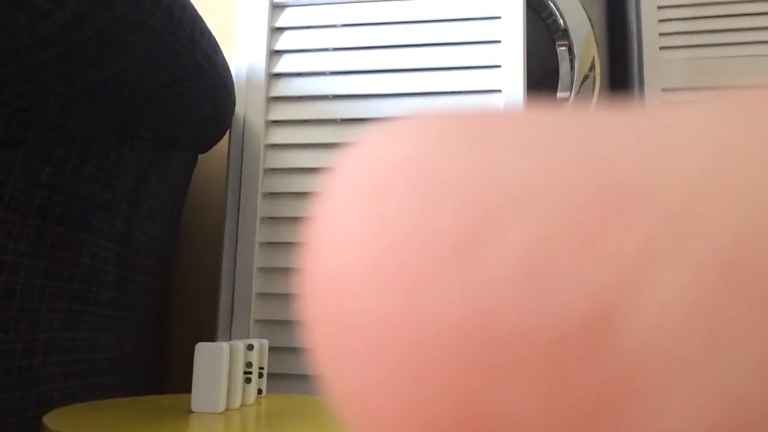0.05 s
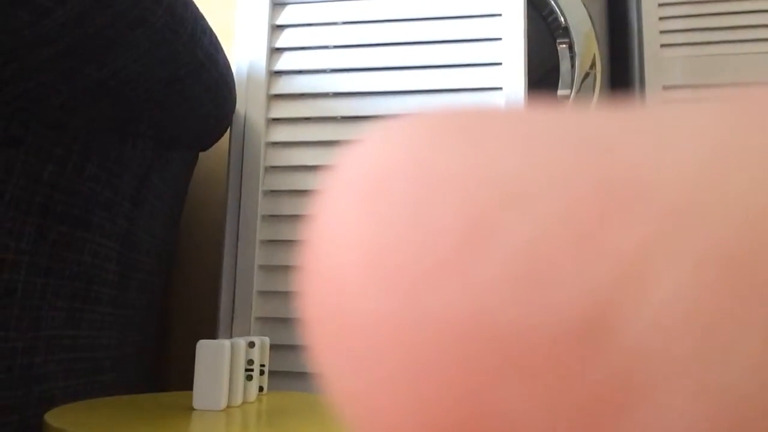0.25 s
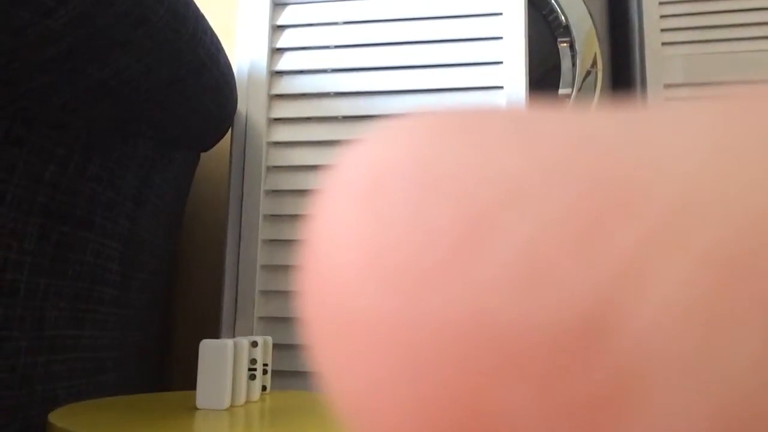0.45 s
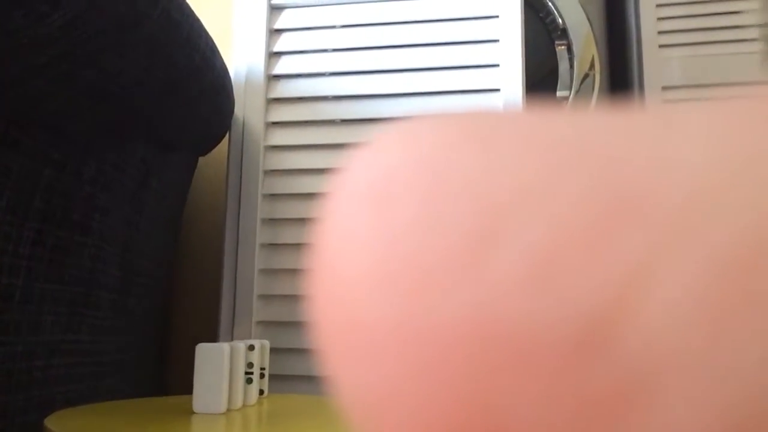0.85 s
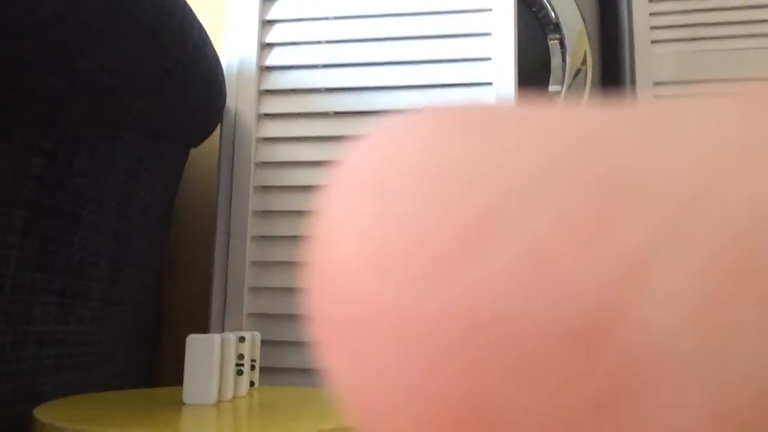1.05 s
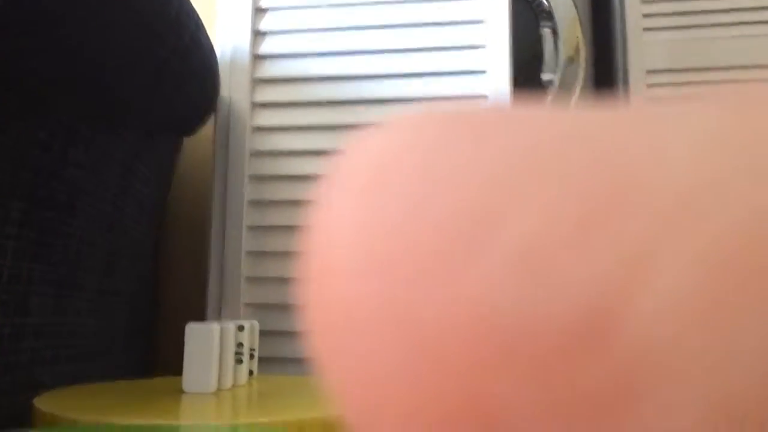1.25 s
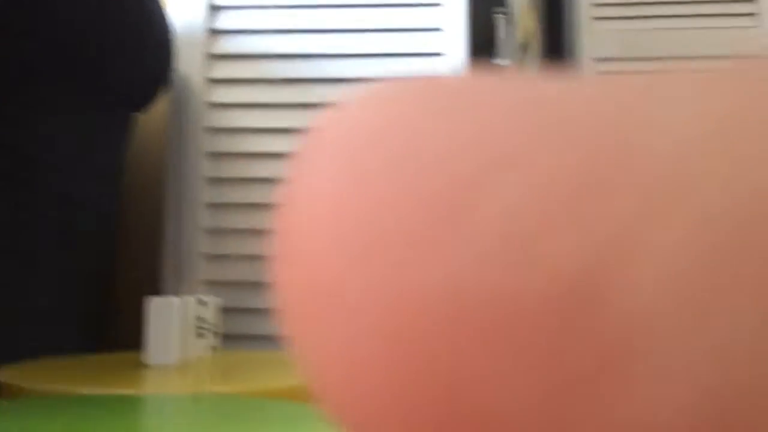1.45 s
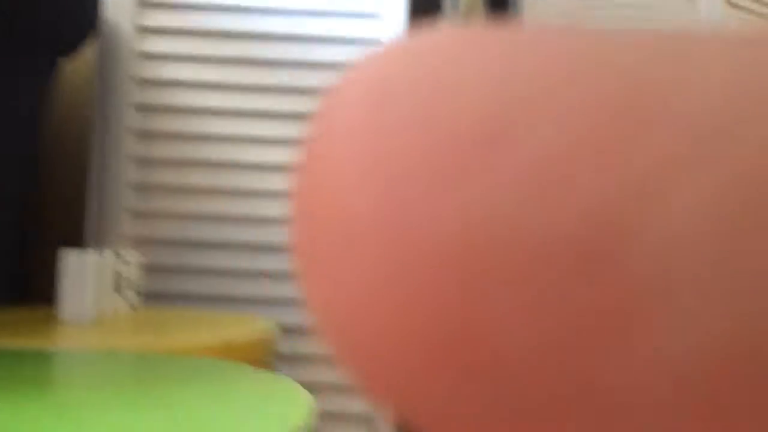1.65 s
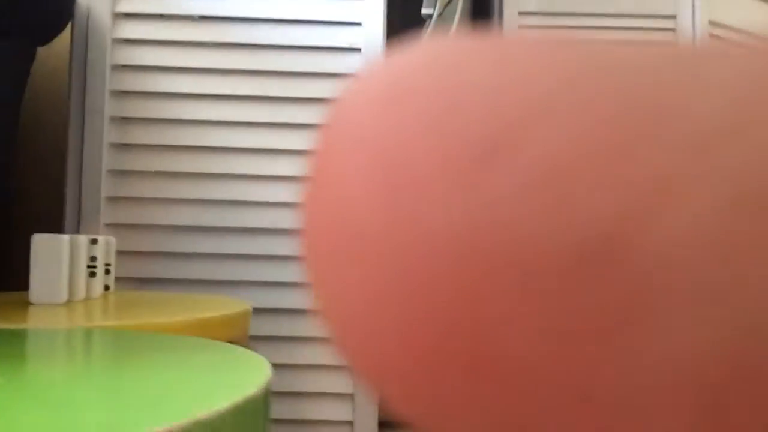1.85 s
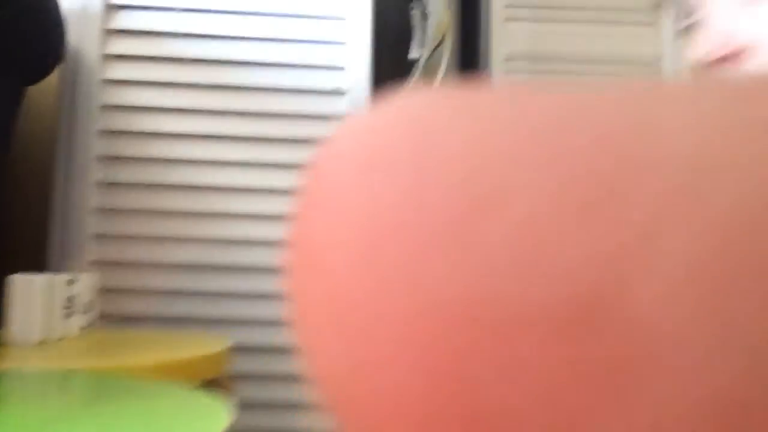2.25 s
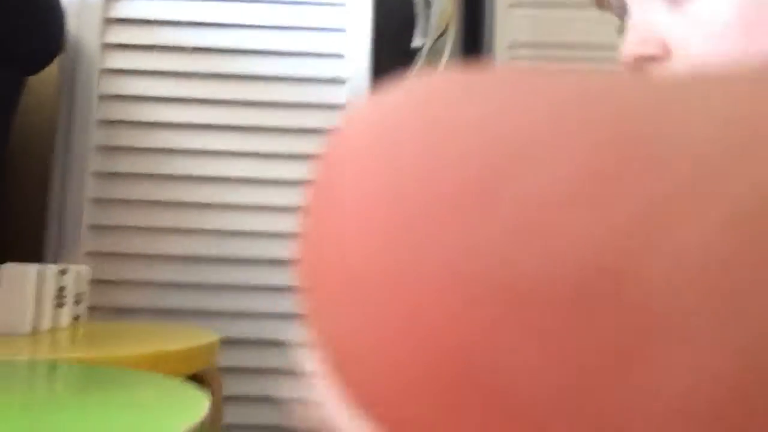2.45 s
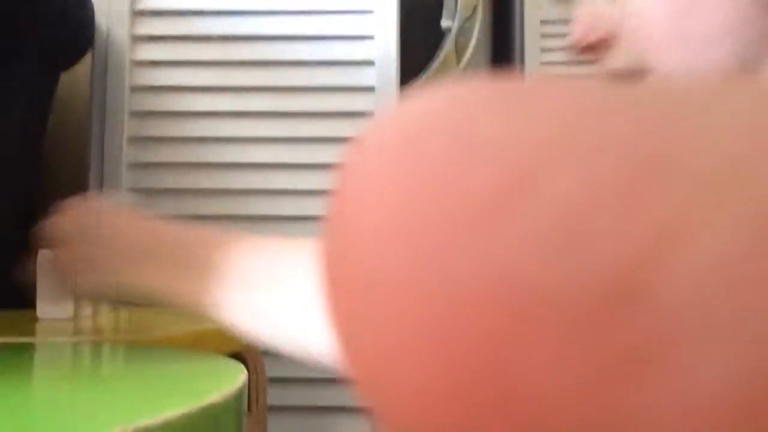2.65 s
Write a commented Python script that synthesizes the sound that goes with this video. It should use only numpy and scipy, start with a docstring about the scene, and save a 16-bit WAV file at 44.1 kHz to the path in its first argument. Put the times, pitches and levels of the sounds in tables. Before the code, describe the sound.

Dominoes slide and tumble on a tabletop with bright clinks, one bounce and light rattles.

```python
"""Dominoes on a small table in a quiet room, close to a single microphone.
First tiles scrape over the top, catching and slipping, and knock as they are set down.
They tumble against each other with bright clinks; then one drops and bounces, ringing the table,
and the weight of the heap draws a brief low rumble from the top.
Last, the loose tiles are stirred and gathered in soft rattles."""
import sys
import numpy as np
from scipy import signal
from scipy.fft import rfft, irfft
from scipy.io import wavfile

SR = 44100
rng = np.random.default_rng(int(sys.argv[2]) if len(sys.argv) > 2 else 0)


def to_wav(s):
    """Save 16-bit WAV."""
    ch = np.atleast_2d(s).T  # columns
    pcm = np.round(np.clip(ch, -1, 1) * 32767)  # PCM
    wavfile.write(sys.argv[1], SR, pcm.astype(np.int16))


N = 119070
T = np.arange(SR // 3) / SR  # seconds since a contact

# Levels in the tables are relative. Spectra, each row: frequency in Hz, level in dB.
AIR_SPECTRUM = [(22, -15), (60, -2), (120, -2), (300, -14.5), (4000, -17), (15000, -26)]
SCRAPE_SPECTRUM = [(180, -43.5), (350, -11), (1000, -12.5), (1500, -3), (4500, 1.5), (8000, 6.5),
                   (9500, -9), (16000, -15.5)]
KNOCK_SPECTRUM = [(200, -48), (700, -21), (1500, -2.5), (4000, 4), (8000, 1.5), (10000, -6.5),
                  (16000, -22.5)]
HOLLOW_SPECTRUM = [(170, -28), (370, 2), (800, 3), (3000, -32.5)]
DROP_SPECTRUM = [(130, -10), (450, -17.5), (1500, -2), (2200, 9.5), (5000, 6), (8000, 7.5), (11000, -6.5),
                 (16000, -25.5)]
CLACK_SPECTRUM = [(250, -54.5), (2000, -4.5), (4000, 4), (7000, 13), (9000, -8), (12000, -17.5),
                  (16000, -21.5)]
# The room's reverberation. Each row: frequency in Hz, t60 in seconds.
ROOM_DECAY = [(500, 0.21), (7000, 0.31), (14000, 0.15)]
# Modes of the table. Each row: frequency in Hz, level in dB, t60 in seconds.
TABLE_MODES = [(489, -14.5, 0.23), (720, -24, 0.48), (1013, -11, 0.18), (1733, -10.5, 0.26),
               (1973, -10, 0.34), (2250, -11, 0.17), (2510, -6, 0.18), (3311, -4.5, 0.21),
               (4000, -9, 0.065), (5140, 0, 0.15)]
# Modes of a tile. Each row: ratio to its pitch, level in dB, t60 in seconds.
TILE_MODES = [(1.0, 2, 0.049), (1.165, -3, 0.045), (2.5, -25, 0.0099)]
# The heap on the top: start in seconds, level in dB, centre in Hz, t60 in seconds (negative: it swells).
HEAP_RUMBLE = (1.5, -49.5, 175.5, -17.9)
# Tiles pushed along. Each row: start and length in seconds, level and its change over the stroke in dB.
SCRAPES = [(0.001, .028, -33.5, -5), (0.228, 0.089, -18.5, 9), (0.32, 0.085, -30, -9),
           (0.385, 0.069, -22.5, -4), (0.46, 0.077, -45.5, 6.5), (0.605, 0.11, -31.5, 12)]
# Runs of small contacts. Each row: start and length in seconds, ring, clack and their change in dB.
RATTLES = [(0.745, 0.064, -10, -19, -12), (0.811, 0.13, -18.5, -29, -3), (0.946, 0.047, -28.5, -38, 5),
           (1.01, 0.067, -39, -46, -4), (1.715, .045, -33.5, -36.5, -7), (1.782, 0.13, -31, -33.5, 11),
           (1.922, .15, -34, -33, -14), (2.136, 0.024, -34.5, -38, -2.5), (2.265, 0.038, -32.5, -34.5, -7),
           (2.367, 0.14, -38.5, -33, -9.5), (2.49, 0.06, -25, -37, 0)]
# Tile on table. Each row: start in seconds, level in dB, level of the hollow low end in dB.
KNOCKS = [(0.0161, -22, -52.5), (0.1006, -16.5, -38.5), (0.1089, -16, -58), (0.1639, -23, -53),
          (0.2299, -10, -33), (0.3706, 1, -37.5), (0.384, 0.5, -31.5), (0.4051, -4.5, -46),
          (0.4341, -4, -40), (0.445, -4.5, -33), (0.5194, -11.5, -63), (0.5577, -19, -48.5),
          (0.592, -1, -35.5), (0.795, -1, -48), (1.5087, -28.5, -71)]
# A dropped tile and its bounce. Each row: start in seconds, level in dB.
DROPS = [(1.275, -6), (1.308, -2.5)]
# Tile on tile. Each row: start in seconds, ring level in dB, clack level in dB.
CLINKS = [(0.4832, -6, -17), (0.7466, -8, -12), (0.7514, 13, -23), (0.77, 8, -19), (0.8054, -7, -23),
          (0.8232, -6, -26), (0.8506, -9, -10.5), (0.9124, -10, -16), (0.9323, -3.5, -47),
          (0.98, -6.5, -37), (1.046, -17.5, -24), (1.0565, -18, -33), (1.3377, -6, -17),
          (1.6569, -33, -31.5), (1.681, -24, -30.5), (1.8438, -17, -9.5), (1.867, -9.5, -21),
          (1.9046, -15, -31), (1.9637, -18, -31), (2.0028, -17.5, -20), (2.2085, -27, -16),
          (2.208, -7.5, -33), (2.2315, -10.5, -21), (2.2888, -6, -22), (2.36, -19, -19.5),
          (2.3852, -15, -11.5), (2.4094, -14, -20), (2.4094, 1.5, -16), (2.4774, -14, -41),
          (2.4876, -15, -16), (2.5005, -1.5, -38)]

TILE_HZ, TILE_SPREAD = 6928, 0.019  # typical pitch, relative scatter between tiles
AIR_DB, HUM_HZ, HUM_DB, ROOM_DB = -61.5, 295, -72, -12
CEILING, TOP_HZ = 0.49, 15850  # the recorder's overload level and treble limit


def amp(db):
    """Decibels to gain."""
    return 10 ** (np.asarray(db) / 20)


def unit(x):
    """Scale to rms 1."""
    return x / np.sqrt(np.mean(x ** 2) + 1e-20)


def along(points, hz):
    """Read (Hz, value) points on a log axis."""
    freqs, values = np.transpose(points)
    return np.interp(np.log(hz + 1), np.log(freqs + 1), values)


def fade(t60, t=T):
    """Exponential decay, 60 dB in t60 seconds."""
    return np.exp(-np.log(1000) * t / t60)


def burst(t60):
    """A third of a second of noise under an exponential envelope."""
    return rng.standard_normal(len(T)) * fade(t60)


def add(track, start, sound):
    """Mix a sound into the track at a start in seconds."""
    part = track[max(0, round(start * SR)):][:len(sound)]
    part += sound[:len(part)]


def colour(x, spectrum, size=4096):
    """Minimum-phase filter with the given spectrum and unit power gain."""
    gains = amp(along(spectrum, np.fft.rfftfreq(size, 1 / SR)))
    cepstrum = irfft(np.log(gains))
    cepstrum[1:size // 2] *= 2
    cepstrum[size // 2 + 1:] = 0
    response = irfft(np.exp(rfft(cepstrum)))
    return signal.fftconvolve(x, response / np.linalg.norm(response))[:N]


def ring(modes, scatter_db):
    """Damped modes, struck a little differently each time."""
    return sum(amp(db + scatter_db * rng.normal()) * fade(t60) * np.sin(2 * np.pi * hz * T)
               for hz, db, t60 in modes)


def strokes(rows, release_s):
    """Envelope of (start, length, dB, change dB) rows: sudden start, ramp, release."""
    t = np.arange(N) / SR
    power = np.zeros(N)
    for start, length, db, change in rows:
        progress = np.clip((t - start) / length, 0, 1)
        release = fade(release_s, np.maximum(t - start - length, 0))
        power += ((t >= start) * amp(db + change * (progress - .5)) * release) ** 2
    return np.sqrt(power)


def contacts(per_second, scatter_db, count=4000):
    """Irregular impulses of random size, rms 1."""
    jitter = 2 * rng.random(count)
    sizes = amp(scatter_db * np.clip(rng.standard_normal(count), -2, 2))
    at = ((np.arange(count) + jitter) * SR / per_second).astype(int)
    return unit(np.bincount(at[at < N], sizes[at < N], N))


def trigger(hits, sounds):
    """Each impulse plays one of the sounds, picked at random."""
    pick = rng.integers(len(sounds), size=N)
    return sum(signal.oaconvolve(hits * (pick == k), sound[:SR // 10] / np.linalg.norm(sound))[:N]
               for k, sound in enumerate(sounds))


def room_tone():
    """Room air and a faint steady hum."""
    air = unit(colour(rng.standard_normal(N), AIR_SPECTRUM))
    hum = unit(np.sin(2 * np.pi * HUM_HZ * np.arange(N) / SR))
    return amp(AIR_DB) * air + amp(HUM_DB) * hum


def reverberation(direct):
    """The room's diffuse tail at the microphone, shortest in the top treble."""
    hz, t, noise = signal.stft(rng.standard_normal(SR // 2), SR, nperseg=256)
    tail = signal.istft(noise * fade(along(ROOM_DECAY, hz)[:, None], t), SR)[1]
    return signal.fftconvolve(direct, tail / np.linalg.norm(tail))[:N]


def heap_rumble():
    """The tumbling heap weighs on the top: a faint, nearly level rumble for a third of a second."""
    start, db, hz, t60 = HEAP_RUMBLE
    push = np.zeros(N)
    add(push, start, amp(db) * burst(t60))
    return colour(push, [(hz / 10, -18), (hz, 0), (hz * 2, -14), (hz * 10, -50)])


def tile_ring(deviation):
    """One tile rings high and short; deviation shifts its pitch in units of TILE_SPREAD."""
    hz = TILE_HZ * (1 + TILE_SPREAD * deviation)
    return ring([(hz * ratio, db, t60) for ratio, db, t60 in TILE_MODES], scatter_db=2.5)


def loose_tiles(count=10):
    """Rings of a handful of tiles, each with its own pitch."""
    deviations = np.linspace(-1, 1, count) + rng.normal(size=count) / 2
    return [tile_ring(deviation) for deviation in deviations]


def clack():
    """The crack of a hard contact with a short tail."""
    return burst(t60=0.0034) + amp(-1) * burst(t60=0.025)


def scrapes():
    """Sliding tiles catch and slip on the top, and ring a little."""
    slips = contacts(per_second=600, scatter_db=4) * strokes(SCRAPES, release_s=0.051)
    grit = trigger(slips, [burst(t60=0.013) for _ in range(8)])
    return colour(grit, SCRAPE_SPECTRUM) + amp(-12.5) * trigger(slips, loose_tiles())


def rattles():
    """Many light contacts as tiles tumble or are stirred."""
    hits = contacts(per_second=300, scatter_db=5)
    ring_rows = [(start, length, db, change) for start, length, db, _, change in RATTLES]
    clack_rows = [(start, length, db, change) for start, length, _, db, change in RATTLES]
    rings = trigger(hits * strokes(ring_rows, release_s=0.069), loose_tiles())
    cracks = trigger(hits * strokes(clack_rows, release_s=0.13), [clack() for _ in range(8)])
    return rings + colour(cracks, CLACK_SPECTRUM)


def knocks(crack_db=-7.5, hollow_db=1, table_db=-38):
    """Tiles are set down: a broad crack, a hollow low end and a trace of the table's ring."""
    cracks, lows, table = np.zeros((3, N))
    for start, db, low_db in KNOCKS:
        crack = burst(t60=0.0075) + amp(-4.5) * burst(t60=0.042)
        add(cracks, start, amp(db + crack_db) * crack)
        add(lows, start, amp(low_db + hollow_db) * burst(t60=0.041))
        add(table, start, amp(db + table_db) * ring(TABLE_MODES, scatter_db=1.5))
    return colour(cracks, KNOCK_SPECTRUM) + colour(lows, HOLLOW_SPECTRUM) + table


def dropped_tile(crack_db=-8.5, table_db=-25):
    """A falling tile strikes and bounces hard enough to ring the whole table."""
    cracks, table = np.zeros((2, N))
    for start, db in DROPS:
        add(cracks, start, amp(db + crack_db) * burst(t60=0.082))
        add(table, start, amp(db + table_db) * ring(TABLE_MODES, scatter_db=4.5))
    return colour(cracks, DROP_SPECTRUM) + table


def clinks(ring_gain_db=-9, clack_gain_db=-2.5):
    """Single tiles hit each other close to the microphone: a crack and a high, short ring."""
    rings, cracks = np.zeros((2, N))
    for start, ring_db, clack_db in CLINKS:
        add(rings, start, amp(ring_db + ring_gain_db) * tile_ring(rng.normal()))
        add(cracks, start, amp(clack_db + clack_gain_db) * clack())
    return rings + colour(cracks, CLACK_SPECTRUM)


def scene():
    """At the microphone, in mono: the tiles up close, the room well behind them."""
    tiles = clinks() + rattles() + scrapes() + knocks() + dropped_tile() + heap_rumble()
    return (tiles + amp(ROOM_DB) * reverberation(tiles) + room_tone())[None]


def record(dry):
    """The recorder rounds off the highest peaks and cuts the top treble."""
    rounded = dry / (1 + (dry / CEILING) ** 6) ** (1 / 6)
    lowpass = signal.ellip(10, .1, 80, TOP_HZ, fs=SR, output="sos")
    return signal.sosfilt(lowpass, rounded)


dry = scene()
out = record(dry)
to_wav(out)
```